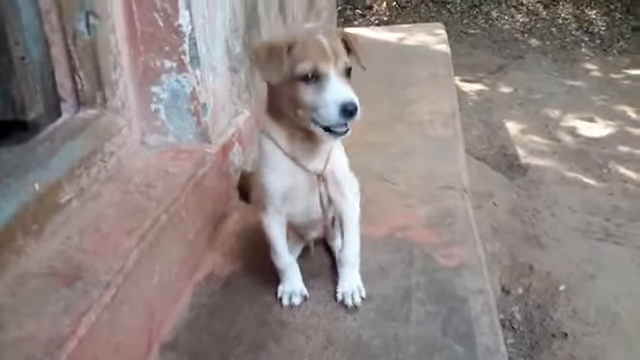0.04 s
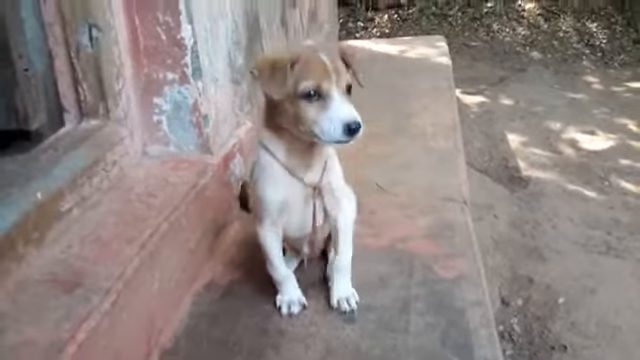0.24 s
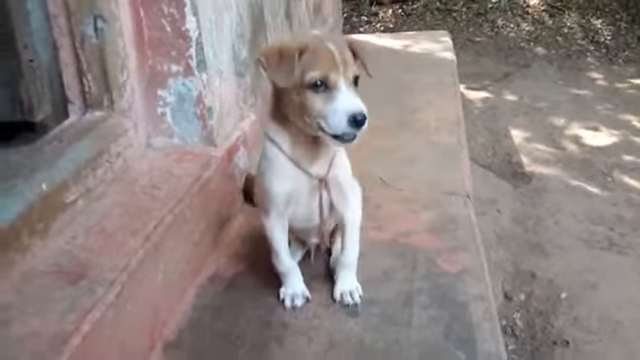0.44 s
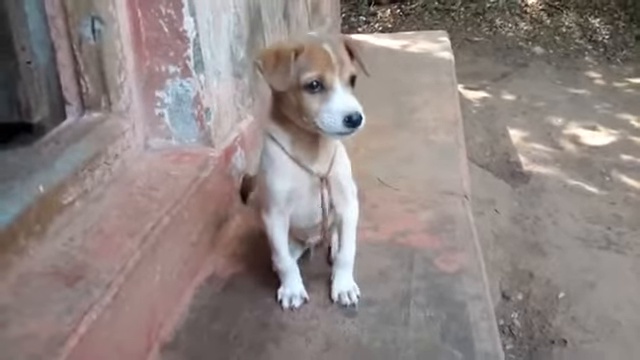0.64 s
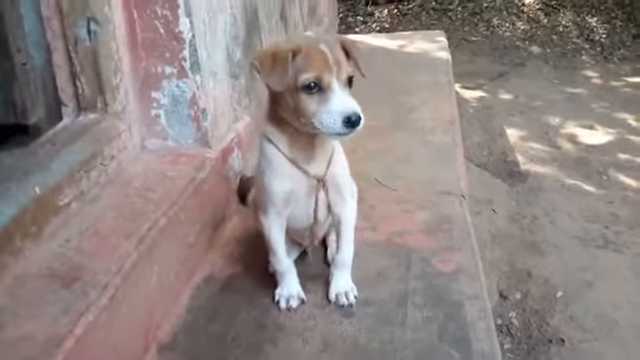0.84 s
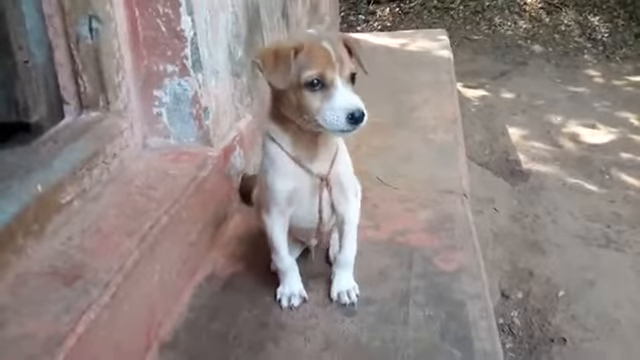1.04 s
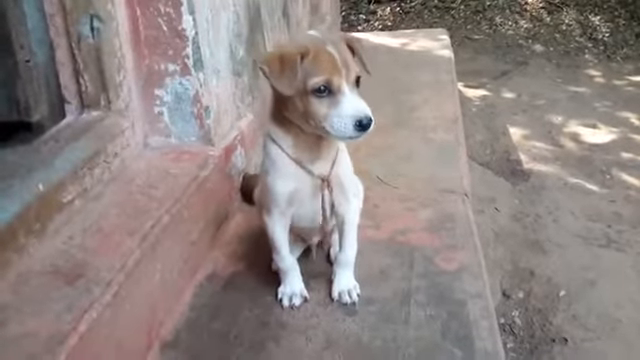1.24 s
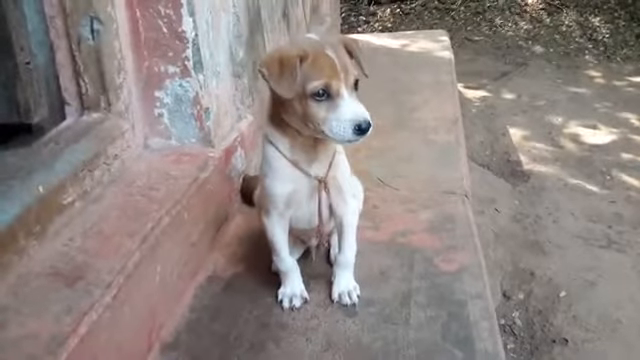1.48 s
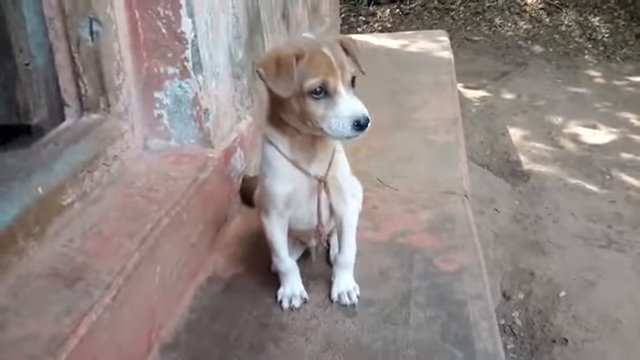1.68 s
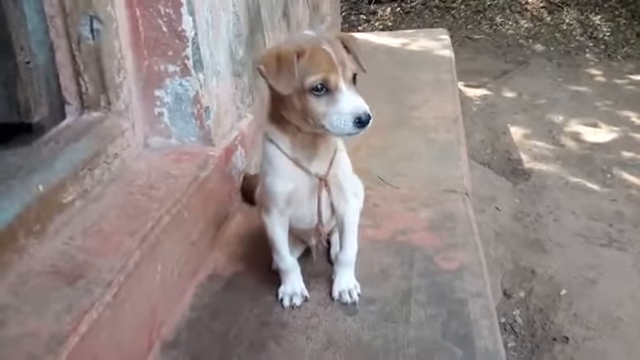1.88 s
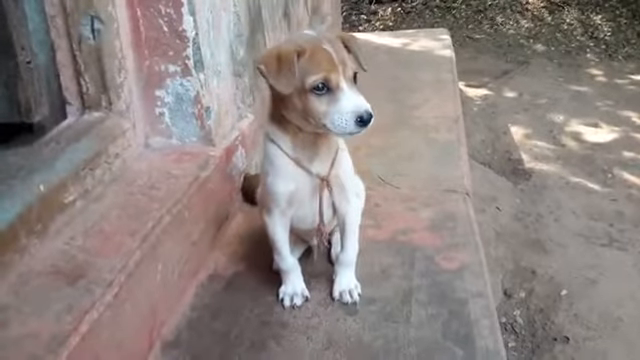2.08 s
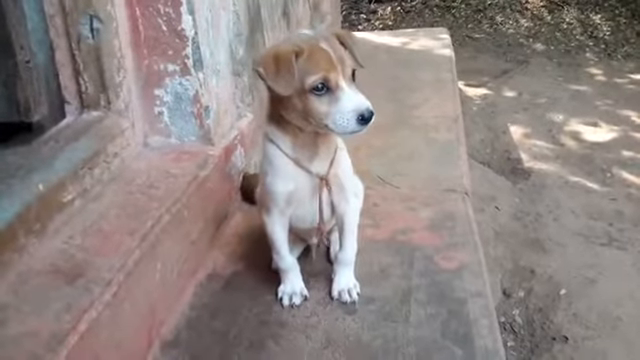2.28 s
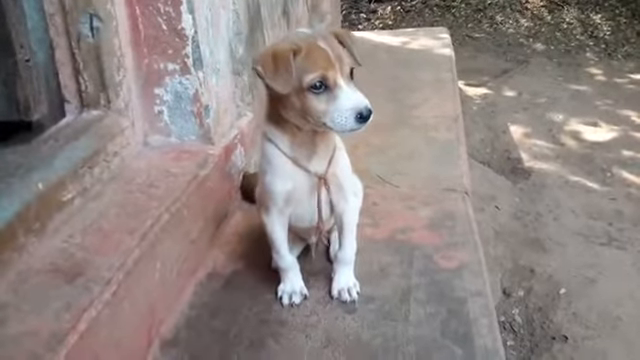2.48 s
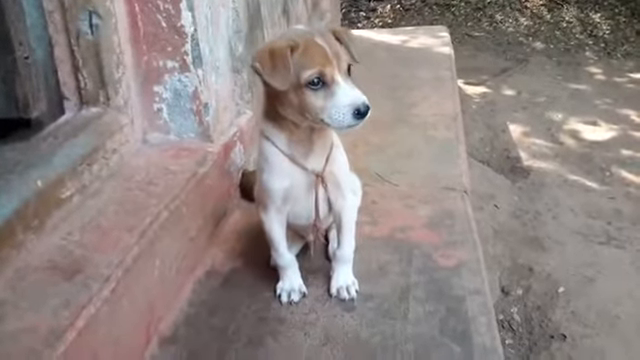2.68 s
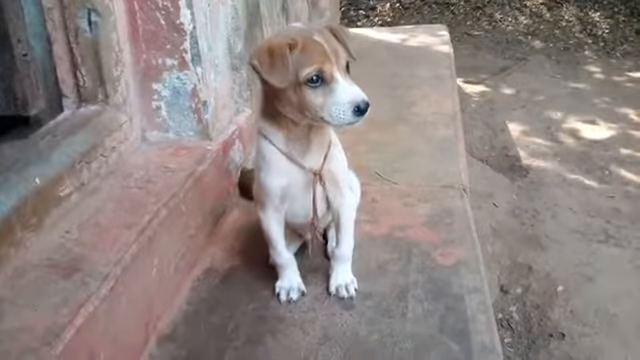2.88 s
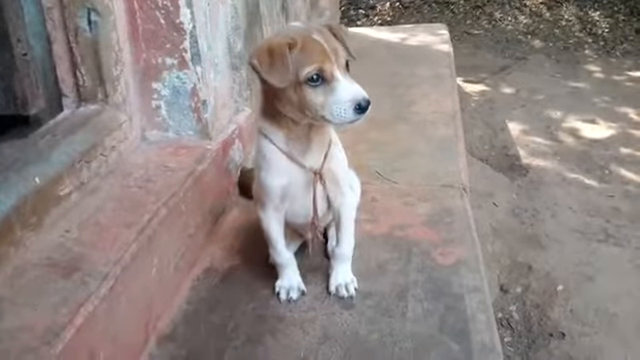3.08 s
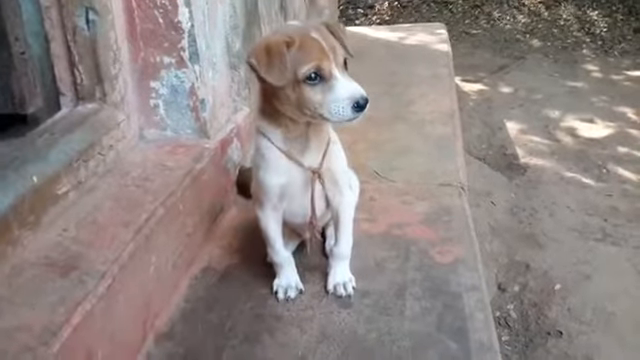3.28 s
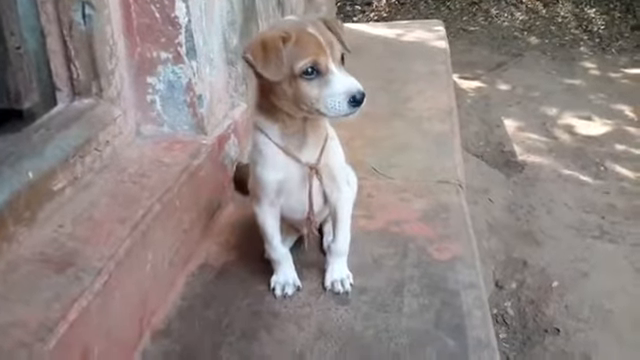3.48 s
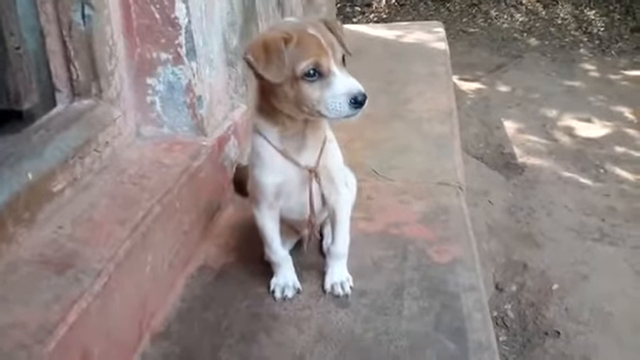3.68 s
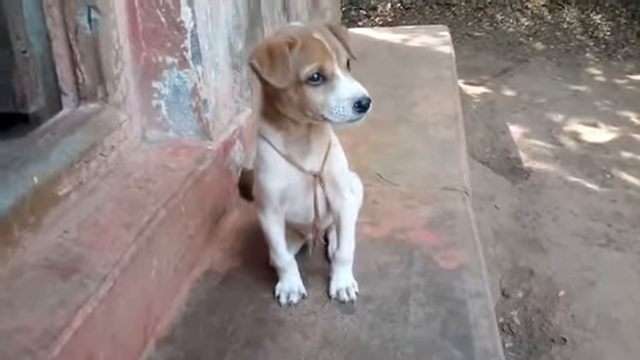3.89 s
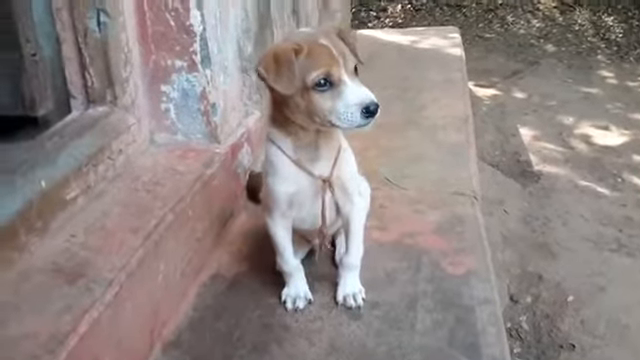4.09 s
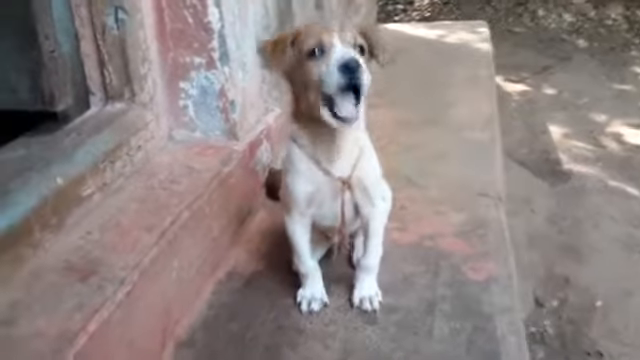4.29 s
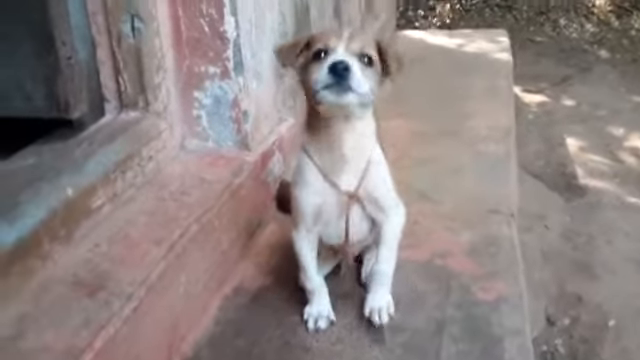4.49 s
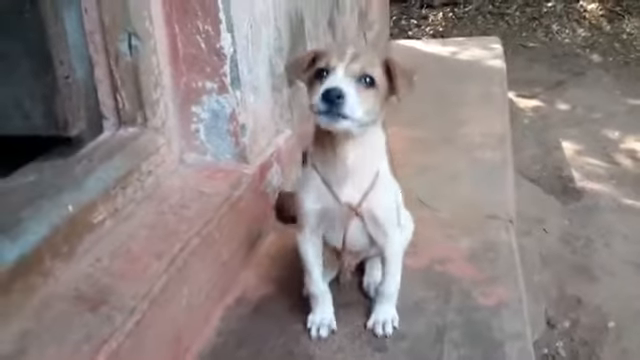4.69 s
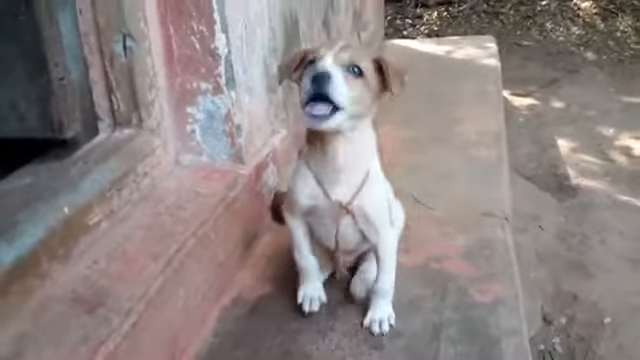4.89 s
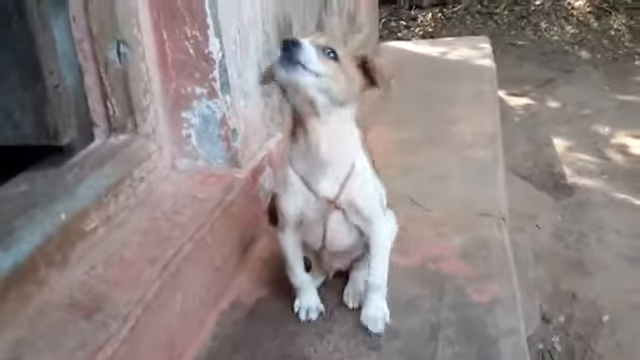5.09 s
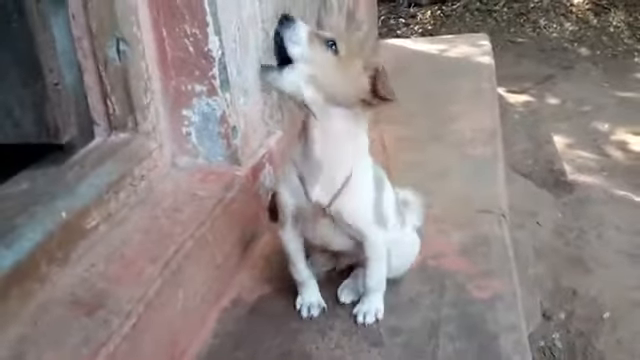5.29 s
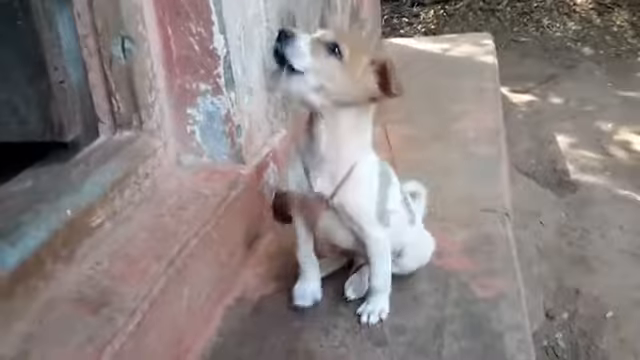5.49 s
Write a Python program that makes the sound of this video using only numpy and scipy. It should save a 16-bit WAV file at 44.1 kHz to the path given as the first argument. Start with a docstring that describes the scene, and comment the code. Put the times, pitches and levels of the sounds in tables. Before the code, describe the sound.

A puppy is close to the microphone on a doorstep, with quiet outdoor air and brief echoes off the walls. One bark is just ending at the start, and two more follow at 0.2 and 0.6 seconds, each a short growl breaking into a clear high note. A soft, stepping whine runs from 1.3 to 1.7 seconds. Around 2.2 seconds something wooden bumps and rattles inside the house. Between 2.5 and 3.4 seconds a very faint animal cry comes from far off, and a distant bird chirps twice. A paw lightly scuffs the step at 3.5 seconds. From 3.8 to 4.2 seconds a thin whine rises in pitch. Four loud, high yips follow at about 4.4, 4.8, 5.1 and 5.4 seconds, each leaping up to a pure note, with tiny squeaks and soft body rubs among them.

```python
"""A puppy barks, whines and yips on a doorstep, close to the microphone; walls and yard answer briefly.
Its vocal folds jump between a rough low register and a clear high one, while jaw and throat move
the resonances that shape the overtones. In the pause something wooden bumps in the house and a paw
scuffs the step. Far off, over quiet outdoor air, an animal calls and a bird chirps twice."""
import sys
import numpy as np
from scipy import signal
from scipy.fft import rfft, irfft, next_fast_len
from scipy.io import wavfile
from scipy.ndimage import uniform_filter1d

SR = 44100
rng = np.random.default_rng(int(sys.argv[2]) if len(sys.argv) > 2 else 0)


def persist_wave(psi):
    """Save psi, clipped to +-1, as 16-bit WAV."""
    counts = np.round(np.clip(psi, -1, 1) * 32767).astype(np.int16)
    wavfile.write(sys.argv[1], SR, np.atleast_2d(counts).T)


N = 244314
TIME = np.arange(N) / SR
CONTROL_STEP_S = .001


def amp(db):
    """Decibels to gain."""
    return 10 ** (np.asarray(db) / 20)


def unit(x):
    """Scales to rms 1."""
    return x / np.sqrt(np.mean(abs(x) ** 2) + 1e-20)


def ramp(t, start, length):
    """Goes from 0 to 1 over length seconds from start."""
    return np.clip((t - start) / length, 0, 1)


def blend(share, a, b):
    """Goes from a to b as share goes from 0 to 1."""
    return a + share * (b - a)


def curve_at(points, hz):
    """Reads rows of (Hz, value) on a log-frequency axis."""
    f, value = np.transpose(points)
    return np.interp(np.log(hz + 1), np.log(f + 1), value)


def add(mix, s, sound):
    """Adds a sound into the mix at s seconds."""
    part = mix[max(round(s * SR), 0):][:len(sound)]
    part += sound[:len(part)]


def noise(spectrum):
    """Noise of rms 1, coloured by rows of (Hz, relative dB)."""
    colour = amp(curve_at(spectrum, np.fft.rfftfreq(N, 1 / SR)))
    return unit(irfft(rfft(rng.standard_normal(N)) * colour, N))


def flutter(size, width_hz):
    """Complex random wobble of rms 1, mostly slower than width_hz."""
    hz = np.fft.fftfreq(next_fast_len(size), 1 / SR)
    white = rng.standard_normal(len(hz)) + 1j * rng.standard_normal(len(hz))
    return unit(np.fft.ifft(white / (1 + (hz / width_hz) ** 2))[:size])


def envelope(s, db):
    """Gain that follows levels in dB at times s, silent outside them."""
    return amp(np.interp(TIME, s, db, left=-120, right=-120))


def resonance(hz, centre_hz, half_width_hz):
    """Gain of a resonance, 1 at its centre."""
    return 1 / (1 + ((hz - centre_hz) / half_width_hz) ** 2)


def air(level_db=-63.5):
    """Quiet outdoor air all round the microphone, drifting slightly in level."""
    # Each row: frequency in Hz, relative level in dB.
    spectrum = [(18, -65), (30, -21), (75, -9), (195, -10), (234, -10), (716, -19), (1000, -19.5),
                (1920, -26), (3070, -27.5), (3500, -27), (15000, -48)]
    drift_db = 1.2 * flutter(N, 3).real
    return noise(spectrum) * amp(level_db + drift_db)


def bird():
    """Faint thin notes, blurred by distance."""
    # Each row: start in seconds, pitch in Hz, level in dB.
    chirps = [(2.58, 3205, -70.5), (2.76, 3070, -72)]
    out, t = np.zeros(N), TIME[:round(.11 * SR)]
    for s, hz, db in chirps:
        tone = flutter(len(t), 59.3) * np.exp(2j * np.pi * hz * t)
        add(out, s, amp(db) * np.hanning(len(t)) * tone.real)
    return out


def far_animal():
    """One long thin cry, blurred by distance."""
    # Each row: time in seconds, pitch in Hz, level in dB.
    cry = [(2.5, 1242, -77), (2.62, 1196, -67), (2.799, 1160, -78), (2.95, 989.2, -73),
           (3.099, 1026, -66.5), (3.25, 1096, -70), (3.42, 1065, -82)]
    s, hz, db = np.transpose(cry)
    tone = flutter(N, 70) * np.exp(2j * np.pi * np.cumsum(np.interp(TIME, s, hz)) / SR)
    return tone.real * envelope(s, db)


def yard(x):
    """The yard's diffuse tail: it builds up quickly, and each band dies at its own speed."""
    # Each row: frequency in Hz, seconds to fall by 60 dB.
    decay_times = [(200, 0.22), (1500, 0.4), (4500, 0.33), (8000, .28), (14000, 0.17)]
    # Each row: frequency in Hz, relative level in dB.
    colour = [(150, -21), (700, -7.5), (1600, -8), (4500, -7), (7000, -3.5), (14000, -6.5)]
    hz, t, bands = signal.stft(rng.standard_normal(32768), SR, nperseg=256)
    band_db = curve_at(colour, hz)[:, None] - 60 * t / curve_at(decay_times, hz)[:, None]
    tail = signal.istft(bands * amp(band_db) * (1 - np.exp(-t / .0054)), SR, nperseg=256)[1]
    return signal.fftconvolve(x, tail / np.linalg.norm(tail))[:N]


def with_walls(x, echo_db=-11, rise_s=.004, t60_s=.11):
    """The direct sound plus dense early echoes off step, door frame and house front."""
    t = TIME[:round(.15 * SR)]
    scatter = rng.standard_normal(len(t)) * (1 - np.exp(-t / rise_s)) * amp(-60 * t / t60_s)
    return x + amp(echo_db) * signal.fftconvolve(x, scatter / np.linalg.norm(scatter))[:N]


def wooden_bump():
    """Inside the house, quick blows ring the low modes of a wooden panel and set it rattling."""
    # Each row: start in seconds, thud in dB, rattle in dB, seconds for the rattle to fall by 60 dB.
    blows = [(2.191, -42, -47.5, 0.3), (2.202, -29, -44, 0.23), (2.235, -25, -38, 0.45),
             (2.256, -19, -47, 0.22), (2.293, -45, -46.5, 0.38), (2.329, -28, -60, 0.38),
             (2.377, -33, -54, 0.52)]
    # Each row: nominal frequency in Hz, relative level in dB, seconds to fall by 60 dB.
    modes = [(157, -3.5, 0.65), (192, 1, 0.39), (219.8, 5.5, 0.28), (287, -6.5, 0.56), (367, -2, 0.31),
             (417, -31, 0.21), (669, -17, 0.52)]
    # Each row: frequency in Hz, relative level in dB.
    rattle_spectrum = [(210, -38.5), (350, -11.5), (681, -14), (755, -17.5), (929, -16), (4450, -33),
                       (12000, -65), (15600, -94), (22000, -120)]
    out, t = np.zeros(N), TIME[:SR]
    for s, thud_db, rattle_db, rattle_t60 in blows:
        panel = sum(amp(db - 60 * t / t60) * np.sin(2 * np.pi * hz * t * rng.uniform(.89, 1.02))
                    for hz, db, t60 in modes)
        thud = amp(thud_db) * panel / abs(panel).max()
        rattle = amp(rattle_db - 60 * t / rattle_t60) * noise(rattle_spectrum)[:SR]
        add(out, s, (thud + rattle) * (1 - np.exp(-t / .0034)))
    return out + amp(-7.5) * yard(out)


def paw_scuff():
    """A paw brushes once across the step."""
    # Each row: frequency in Hz, relative level in dB.
    spectrum = [(41, -30), (70, 3), (535, -26), (762, -14.5), (2490, -20), (5590, -25.5), (10000, -54.5),
                (13000, -79.5), (22000, -120)]
    # Each row: time in seconds, level in dB.
    levels = [(3.515, -84.5), (3.535, -58), (3.57, -52), (3.61, -60.5), (3.70, -73)]
    return noise(spectrum) * envelope(*np.transpose(levels))


def body_shifts():
    """Soft low rubs of body and paws on concrete."""
    # Each row: start in seconds, length in seconds, level in dB.
    rubs = [(0.198, 0.25, -52), (0.68, 0.18, -56), (3.74, 0.16, -57.5), (4.531, 0.31, -55),
            (5.025, 0.1, -51)]
    # Each row: frequency in Hz, relative level in dB.
    spectrum = [(60, -26.5), (130, -11), (190, 3.5), (280, -10), (500, -18), (2000, -41), (8000, -72)]
    level = sum(amp(db) * np.sin(np.pi * ramp(TIME, s, length)) for s, length, db in rubs)
    return level * noise(spectrum)


def bark_hiss():
    """A soft hiss trails the first two barks."""
    # Each row: frequency in Hz, relative level in dB.
    spectrum = [(120, -33), (200, 0), (370, -17), (451, -7), (560, -2.5), (880, -2.5), (998, -12),
                (1220, -7.5), (1510, -8.5), (4550, -4), (6530, -5.5), (15000, -31.5)]
    # Each row: time in seconds, level in dB.
    levels = [(0, -35), (.06, -41), (.13, -49.5), (0.198, -51.5), (.24, -30.5), (.33, -33), (.41, -41.5),
              (0.498, -55), (0.561, -65)]
    return noise(spectrum) * envelope(*np.transpose(levels))


def squeaks(fall_hz_per_s=14000):
    """Brief falling whistles, far above the pitch, as air squeezes through the tight throat."""
    # Each row: midpoint in seconds, frequency there in Hz, level in dB.
    whistles = [(3.971, 13400, -53), (4.163, 12950, -44.5), (4.46, 14900, -36.5), (4.579, 11300, -35),
                (4.95, 12900, -47), (5.2, 13400, -54)]
    out, t = np.zeros(N), np.arange(-.022, .022, 1 / SR)
    for s, hz, db in whistles:
        tone = flutter(len(t), 120) * np.exp(2j * np.pi * np.cumsum(hz - fall_hz_per_s * t) / SR)
        add(out, s + t[0], amp(db) * np.hanning(len(t)) * unit(tone.real))
    return out


def wavering(controls, speed_hz=22.2, pitch_share=.004, depth_db=2.73):
    """The young voice is unsteady: pitch and the strength of mouth and throat wander a little."""
    t, pitch, rough, base_db, mouth_hz, mouth_db, throat_hz, throat_db = controls
    at = ((t - t[0]) * SR).astype(int)
    folds, mouth, throat = (flutter(at[-1] + 1, speed_hz).real[at] for _ in range(3))
    return (t, pitch * (1 + pitch_share * folds), rough, base_db,
            mouth_hz, mouth_db + depth_db * mouth, throat_hz, throat_db + depth_db * throat)


def voice(controls, upper_hz, upper_db, sheen_db):
    """Vocal-fold harmonics lifted by the moving resonances of mouth and throat; gives start and sound."""
    # Sheen of the top overtones. Each row: frequency in Hz, relative level in dB.
    sheen_spectrum = [(6500, -42), (8000, -13), (9400, -9), (10300, -9), (11200, -6), (12000, -10),
                      (13500, -4), (15400, -16)]
    s, *curves = wavering(controls)
    t = np.arange(s[0], s[-1] + .0055, 1 / SR)
    # base_db is the level of the fundamental; rough runs from 0 (clear) to 1 (hoarse)
    pitch, rough, base_db, mouth_hz, mouth_db, throat_hz, throat_db = (np.interp(t, s, c) for c in curves)
    jitter = (.0035 + .07 * rough ** 2) * flutter(len(t), 90).real  # rough folds wander in pitch
    phase = 2 * np.pi * np.cumsum(pitch * (1 + jitter)) / SR
    effort_db = (throat_db + np.maximum(base_db, mouth_db)) / 2
    jaw_open = np.clip((mouth_hz - 900) / 1200, 0, 1)
    out = np.zeros(len(t))
    for k in range(1, 37):
        hz = k * pitch
        mouth = amp(mouth_db) * resonance(hz, mouth_hz, 380)
        pharynx = amp(mouth_db + 2.5) * resonance(hz, 1330, 54) * jaw_open
        throat = amp(throat_db) * resonance(hz, throat_hz, 330 * (1 + 2 * rough))
        upper = amp(throat_db + upper_db) * resonance(hz, upper_hz, 450)
        tract = np.sqrt(mouth ** 2 + pharynx ** 2 + throat ** 2 + upper ** 2)
        tract /= np.sqrt(1 + (hz / 7100) ** 36)
        # the top overtones come and go one by one, and gain as the pitch climbs
        flicker_db = 9 * flutter(len(t), 24).real
        sheen = amp(effort_db + sheen_db + curve_at(sheen_spectrum, hz) + flicker_db)
        sheen *= (pitch / 1200) ** .9
        gain = amp(base_db) if k == 1 else np.hypot(tract, sheen) * (hz < SR / 2)
        # turbulence smears each harmonic, the high ones most
        smear = np.clip((rough + .01) * (hz / 3800) ** .8 + (hz / 22000) ** 2, 0, .9)
        wobble = np.sqrt(1 - smear ** 2) + smear * flutter(len(t), 330)
        out += gain * (wobble * np.exp(1j * (k * phase + rng.uniform(0, 2 * np.pi)))).real
    onset = np.clip(phase / (2 * np.pi * 1.6), 0, 1)  # the folds take 1.6 cycles to get swinging
    return s[0], out * onset * np.clip((t[-1] - t) / .008, 0, 1)


def whine(contour):
    """Voice controls of a whine: brighter as it rises, rough where the pitch slips and at both ends."""
    s, *columns = np.transpose(contour)
    t = np.arange(s[0], s[-1], CONTROL_STEP_S)
    pitch, base_db, mouth_db = (np.interp(t, s, c) for c in columns)
    octaves = np.log2(pitch / 855)  # above this pitch the throat outshines the mouth
    glide = uniform_filter1d(abs(np.gradient(octaves, t)), size=15)
    ends = np.exp(-np.minimum(t - s[0], s[-1] - t) / .013)
    rough = np.clip(.024 + .023 * glide + ends, 0, 1)
    mouth_hz = 420 + 1.775 * pitch  # the mouth opens with the pitch, the throat stays put
    throat_hz, throat_db = np.full(len(t), 4385), mouth_db + 9.5 * octaves
    return t, pitch, rough, base_db, mouth_hz, mouth_db, throat_hz, throat_db


def yip(start, lead, climb, hold, release, first_hz, break_hz, top_hz, drift,
        lead_db, held_base_db, held_mouth_db, held_throat_db, climb_throat_hz):
    """Voice controls of a yip: a soft lead-in, a bright climb, a break to a pure held note, a drop."""
    open_pitch_hz, swell_db_per_s = 976, 86
    opening_s, break_s, leap_s = .023, .019, .01133
    leap = start + lead + climb
    stop = leap + hold
    t = np.arange(start, stop + release, CONTROL_STEP_S)
    opened = ramp(t, start + lead - opening_s / 2, opening_s)
    clear = ramp(t, leap - break_s / 2, break_s)
    high = 1 - np.exp(-np.maximum(t - leap, 0) / leap_s)
    fall, to_go = ramp(t, stop, release), np.maximum(stop - t, 0)

    low_hz = blend(ramp(t, start, lead) ** 2, first_hz, open_pitch_hz)
    low_hz += (break_hz - open_pitch_hz) * ramp(t, start + lead, climb)
    pitch = blend(high, low_hz, top_hz - drift * to_go) * (1 - .25 * fall ** 1.354)
    crack = .14 * np.exp(-((t - leap) / .0053) ** 2)
    rough = blend(high, blend(opened, .41, .021), .011) + crack + .25 * fall

    soft_db, fade_db = lead_db * (1 - opened), -24.5 * fall ** 1.85
    base_db = blend(clear, -22.5, held_base_db - swell_db_per_s * to_go) + .35 * soft_db + fade_db
    mouth_db = blend(clear, -15, held_mouth_db - swell_db_per_s * to_go) + soft_db + fade_db
    high_throat_db = blend(ramp(t, leap, hold), -7.5, held_throat_db)
    throat_db = blend(high, -11, high_throat_db) + soft_db + fade_db
    mouth_hz, throat_hz = blend(high, 2056, 3320), blend(high, climb_throat_hz, 4590)
    return t, pitch, rough, base_db, mouth_hz, mouth_db, throat_hz, throat_db


def bark(start, attack, growl, ringing, closing, first_hz, ring_hz, open_hz, accent_db, ring_db, lag):
    """Voice controls of a bark: a rising growl breaks into a clear note that droops as the jaw shuts."""
    growl_top_hz, sag_hz_per_s, break_s = 545.5, 170, .011
    leap = start + growl
    shut = leap + ringing
    end = shut + closing
    t = np.arange(max(start, 0), end, CONTROL_STEP_S)
    opened, rise = ramp(t, start, attack), ramp(t, start + attack, growl - attack)
    clear, closed = ramp(t, leap - break_s / 2, break_s), ramp(t, shut, .02)
    since_leap, droop = np.maximum(t - leap, 0), np.exp((t - end) / .011)

    def stages(growling, held, shutting):
        """Moves through one value for each stage of the bark."""
        return blend(closed, blend(clear, growling, held), shutting)

    overshoot = 1 + .079 * np.exp(-since_leap / .012)
    note_hz = (ring_hz - sag_hz_per_s * since_leap) * overshoot * (1 - .24 * droop)
    pitch = blend(clear, blend(ramp(t, start, growl), first_hz, growl_top_hz), note_hz)
    growl_rough = blend(np.maximum(rise ** 2, 1 - opened ** 2), .076, .5)
    note_rough = .012 + .5 * np.exp(-since_leap / .011)
    rough = np.where(t < leap, growl_rough, note_rough) + .3 * droop

    accent = accent_db * np.exp(-((t - start - attack) / .011) ** 2)
    base_db = stages(-22.5, -41.5, -26) - 12.5 * (1 - rise) - 4 * droop
    mouth_db = stages(-18.5, -23.5, -31.5) - 19.5 * (1 - opened ** 2) + accent
    throat_db = stages(-18, ring_db, -25) - 72.5 * np.exp((start - t) / lag) - 30 * droop
    growl_mouth_hz = blend(opened ** 2, 620, blend(np.sqrt(rise), open_hz, 1700))
    mouth_hz = stages(growl_mouth_hz, 1979.4, 1600)
    throat_hz = blend(ramp(t, leap, .02), 5010, 4640)
    return t, pitch, rough, base_db, mouth_hz, mouth_db, throat_hz, throat_db


def puppy_calls():
    """Close to the microphone, one voice gives three barks, two soft whines and four yips."""
    # Each row: start, attack, growl, ringing and closing in seconds; first pitch, ringing pitch and
    # open-mouth resonance in Hz; accent and ringing throat level in dB; throat lag in seconds.
    barks = [(-0.2, .02, 0.078, .106, .05, 385, 945, 2000, 0, -12.5, .006),
             (0.2, .022, .08, .104, 0.041, 386.9, 948, 2266, 6.5, -10, .006),
             (0.622, .052, .15, .072, .079, 275, 913, 1600, 0.5, -8.5, .029)]
    # Each row of both whines: time in seconds, pitch in Hz, fundamental in dB, mouth resonance in dB.
    stepping_whine = [(1.349, 333.5, -44, -51), (1.406, 456.4, -31, -38), (1.425, 684.4, -24.5, -35.5),
                      (1.472, 675.5, -37, -34), (1.485, 808, -24.5, -33.5), (1.53, 817.5, -21, -32),
                      (1.597, 794.5, -27, -34.5), (1.613, 672.4, -27, -33), (1.705, 626.7, -26, -40),
                      (1.74, 726, -40, -59)]
    rising_whine = [(3.763, 804, -47, -61), (3.78, 743, -35.5, -48), (3.822, 953, -45.5, -51.5),
                    (3.88, 965, -44, -45.5), (3.953, 1020, -48, -42), (3.968, 1170, -36.5, -42.5),
                    (3.986, 1167, -40, -39), (4.005, 1248, -41, -36), (4.125, 1409, -32, -36),
                    (4.148, 1284, -33.5, -47), (4.172, 1274, -48, -62)]
    # Each row: start, lead-in, climb, hold and release in seconds; first, break and last held pitch
    # in Hz; drift in Hz/s; lead-in overtones in dB; fundamental, mouth and throat as the hold ends
    # in dB; climbing throat and upper resonance in Hz; upper resonance re throat and sheen in dB.
    yips = [(4.386, .028, 0.041, 0.14, 0.027, 758, 1156, 1634, 928.5, -39.5, -9.5, -28, -11, 4460, 5570, -8, -34),
            (4.806, 0.03, .025, 0.055, 0.039, 582, 1104, 1486, -9, -27, -14.5, -30, -19, 4170, 5140, 0.5, -30),
            (5.104, 0.019, .044, .067, .022, 715, 1243, 1634, -1, -29.5, -8.5, -21, -20, 3450, 5130, 0, -38),
            (5.387, 0.014, 0.03, .093, .015, 919, 1310, 1571, 308, -19.5, -3, -25, -23.5, 3510, 4840, 0.5, -49.5)]
    out = np.zeros(N)
    for row in barks:  # the first is already ending as the scene opens
        add(out, *voice(bark(*row), upper_hz=5950, upper_db=-19.5, sheen_db=-36))
    add(out, *voice(whine(stepping_whine), upper_hz=5570, upper_db=-9.5, sheen_db=-28.5))
    add(out, *voice(whine(rising_whine), upper_hz=5220, upper_db=-12.5, sheen_db=-32))
    for *shape, upper_hz, upper_db, sheen_db in yips:
        add(out, *voice(yip(*shape), upper_hz, upper_db, sheen_db))
    return out


def scene():
    """One microphone at the doorstep: the puppy and its echoes in front, house and yard behind."""
    calls = puppy_calls()
    puppy = with_walls(calls + squeaks()) + amp(-18) * yard(calls) + bark_hiss()
    paws = paw_scuff() + body_shifts()
    return (puppy + paws + wooden_bump() + far_animal() + bird() + air())[None]


def record(dry):
    """The recorder cuts the top treble steeply."""
    edge_hz = 15150
    lowpass = signal.firwin(511, edge_hz, window=("kaiser", 9), fs=SR)
    return signal.oaconvolve(dry, lowpass[None], "same")


dry = scene()
out = record(dry)
persist_wave(out)
```